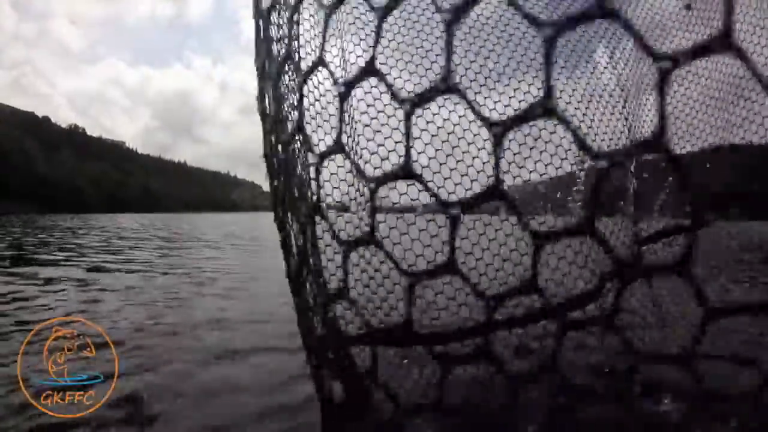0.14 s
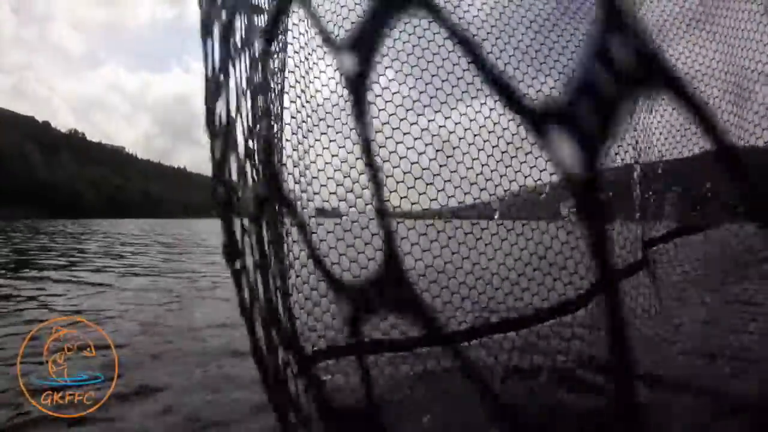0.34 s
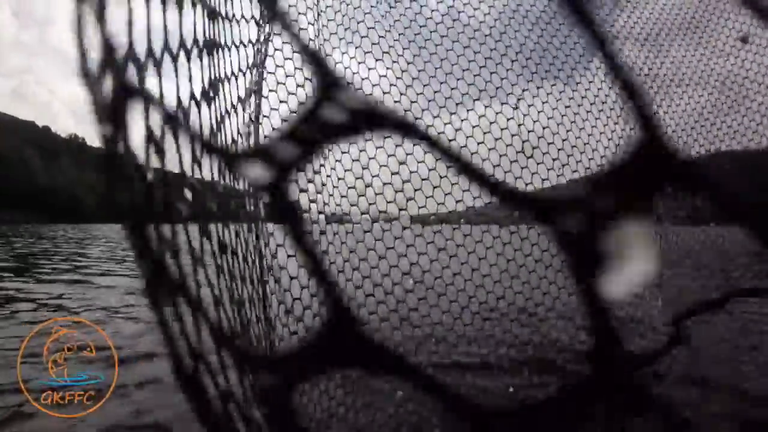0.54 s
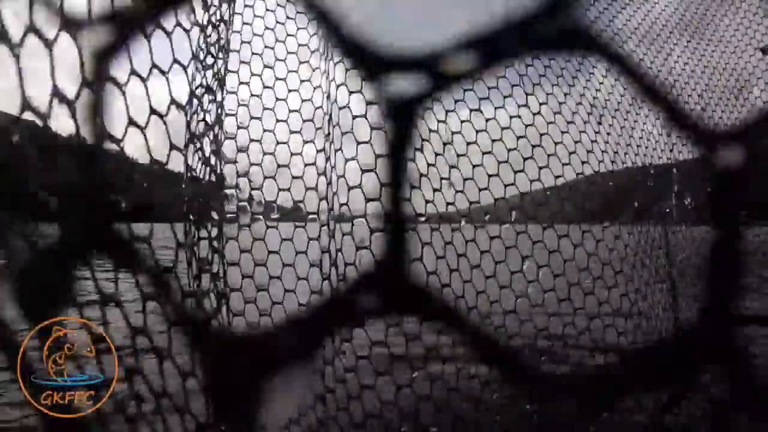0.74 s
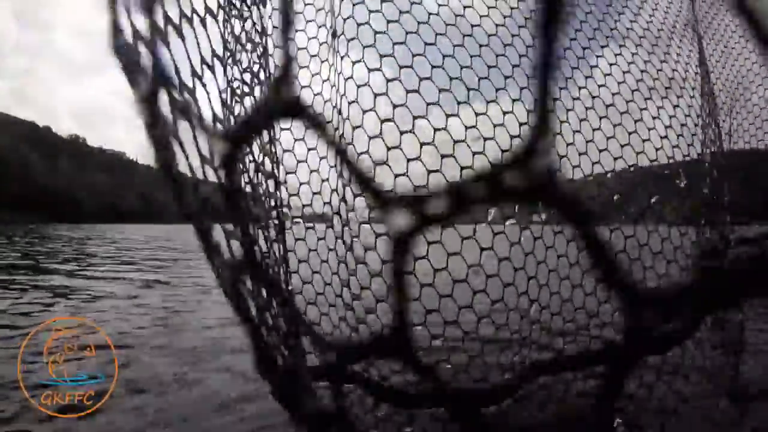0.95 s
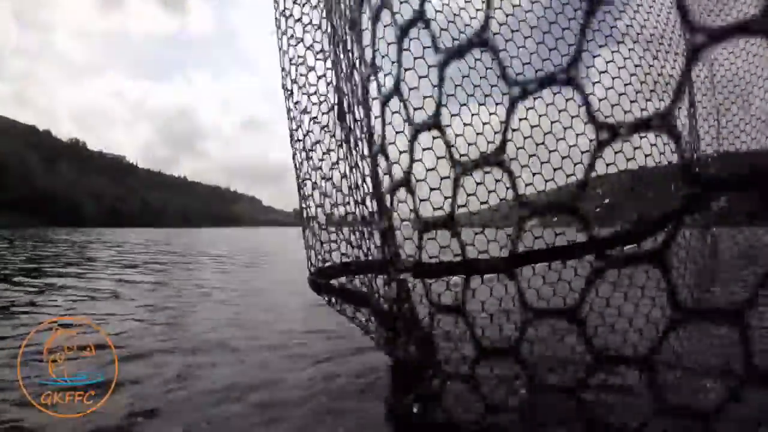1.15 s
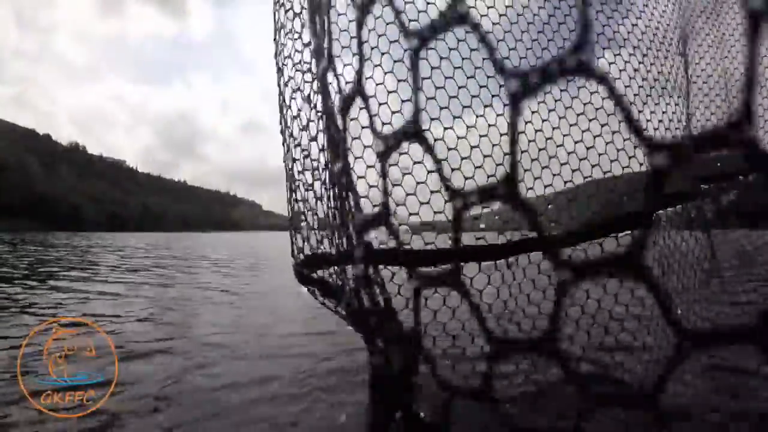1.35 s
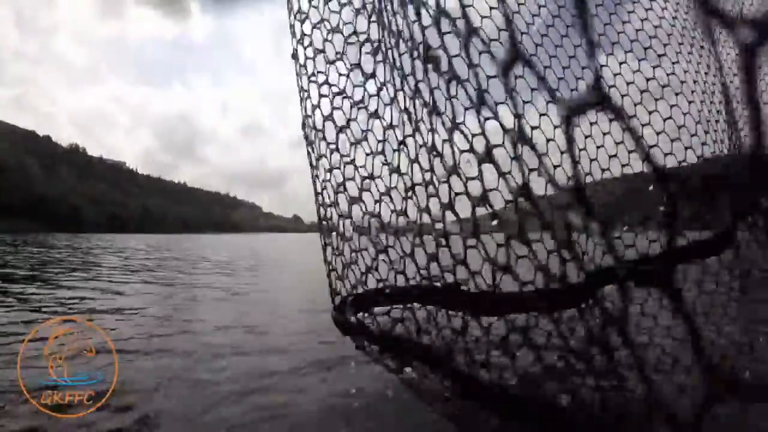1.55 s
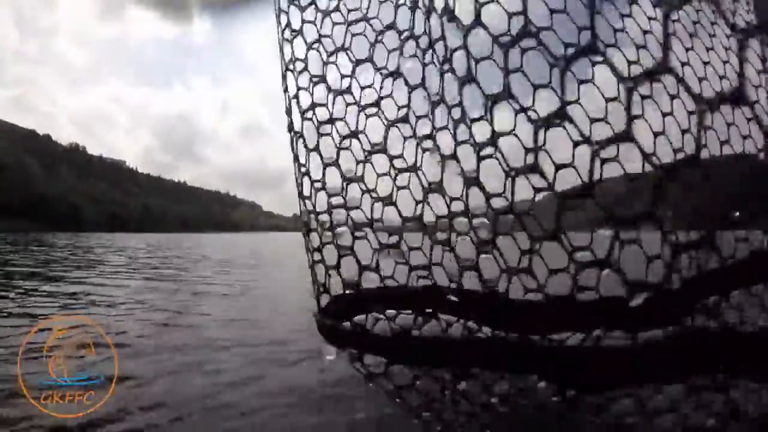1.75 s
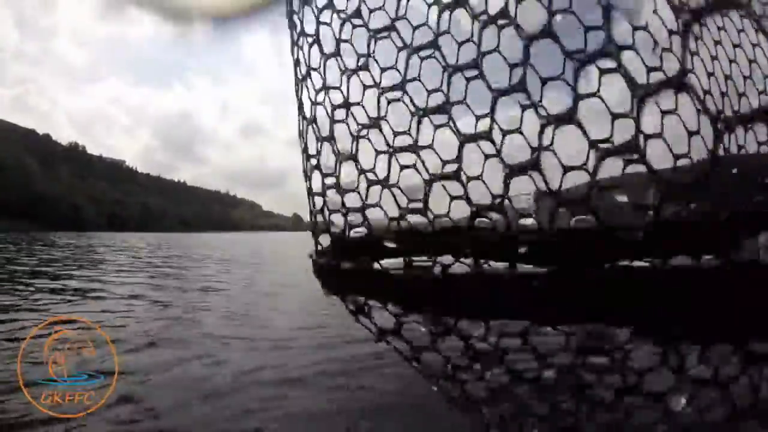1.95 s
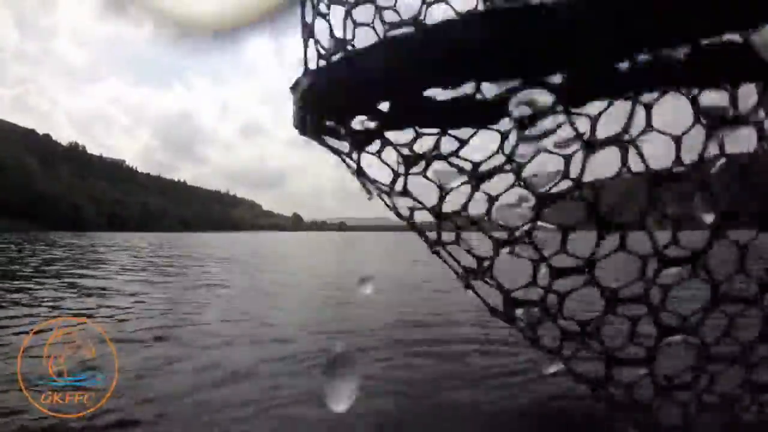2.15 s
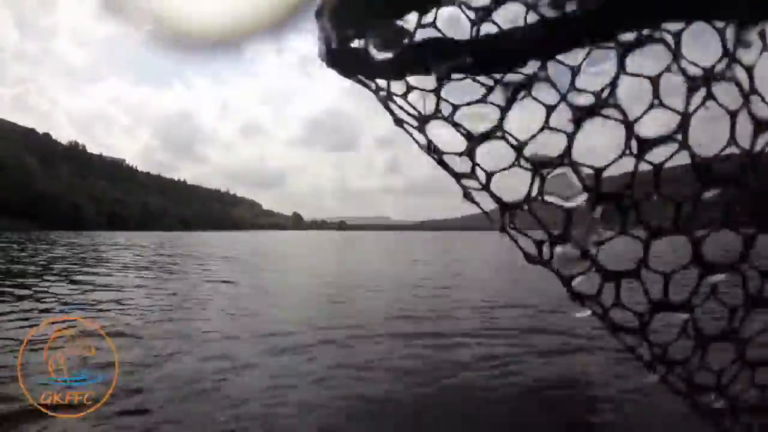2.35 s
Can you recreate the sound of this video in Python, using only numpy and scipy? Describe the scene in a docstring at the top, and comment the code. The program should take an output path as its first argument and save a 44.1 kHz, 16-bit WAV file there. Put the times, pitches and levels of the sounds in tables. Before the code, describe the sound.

Wet landing net rasps and scrapes across a camera housing at a lake's edge, with drips

```python
"""A wet landing net drags over a camera housing at the waterline of a lake, close to the one microphone.
Four strokes of mesh rasp as dense stick-slip impulses coloured by the housing; knots scrape as short
bursts and strands snap as clicks with a gritty tail. Mesh and housing resonate, from slow swells to
millisecond pitched knocks; fine mesh zips, a strand squeaks, and low thumps mark the net's bumps.
Drops tick and bubble on the lake, over a faint noise wash and a bass rumble of wind and the moving net."""
import sys
import numpy as np
from scipy import signal
from scipy.fft import rfft, irfft, next_fast_len
from scipy.io import wavfile
from scipy.ndimage import uniform_filter1d, map_coordinates

SR = 44100
rng = np.random.default_rng(int(sys.argv[2]) if len(sys.argv) > 2 else 0)


def unload_audio(sound):
    """Save the sound as a 16-bit wav file, at the path given as the first command line argument."""
    columns = np.transpose(np.atleast_2d(sound))
    # keep every value between -1 and 1, then stretch to whole-number steps
    steps = np.round(np.clip(columns, -1, 1) * 32767)
    wavfile.write(sys.argv[1], SR, steps.astype(np.int16))


N = 110250  # samples: 2.5 s

# Colour of the housing where the side mesh slides. Each row: frequency in Hz, gain in dB.
SIDE_COLOUR = [(180, -51), (340, -16), (467, -32), (523, -10.5), (647, -20), (828, -12.5), (1010, -18),
               (1350, -8.5), (1760, -1), (1970, -4.5), (2690, 4), (3070, -7.5), (4200, -4.5), (4620, -16),
               (6300, -11), (7790, -18.5), (15000, -32.5)]

SHELF_HZ, BODY_HZ = 3380, 1330  # treble lies above the first corner, body below the second
SLIP_SPREAD = 0.35  # unevenness of the slips (natural log of strength)
PATCHY_DB = 2  # depth of the patches in the colour
CONTACT_SHIFT = 0.016  # shift of the housing colour from knot to knot (natural log of frequency)
FLUTTER_DB, FLUTTER_PER_S = 1.17, 130  # unsteadiness of the rubbing
HISS_GROWS = 0.26  # extra dB of treble per dB of rubbing
HISS_FLUTTER_DB = 0.5  # the treble's own unsteadiness
FADE_S = 0.04  # ramp at either end of a stroke
SNAP_T60_S, SNAP_RISE_S, SNAP_GRIT = 0.016, 0.0008, 0.43  # the grit's decay, onset and share
DROP_T60_S, DROP_RISE_S = 0.022, 0.00045
DROP_BEND_PER_S = 4.4  # the pitch rises by twice this fraction per second
DROP_ROUGH = 0.52  # phase unsteadiness of a bubble (radians)
SQUEAK_S, SQUEAK_LENGTH_S, SQUEAK_DB = 1.752, 0.015, -38
SQUEAK_HZ, SQUEAK_ARCH_HZ = 4240, 910  # top pitch, and its fall towards either end
RESONANCE_WAVER = 0.99  # phase unsteadiness (radians)
ZIP_HZ = 8170
ZIP_KNOTS_PER_S = 950  # faster random motion widens the band
LAKE_DB = -57
TOP_HZ = 15450  # the microphone's band limit


def amp(db):
    """Decibels to gain."""
    return 10 ** (np.asarray(db) / 20)


def unit(x):
    """x at rms 1."""
    return x / np.sqrt(np.mean(x ** 2) + 1e-20)


def curve(rows):
    """(s, value) points as one value per sample."""
    return np.interp(np.arange(N) / SR, *np.transpose(rows))


def wobble(rate):
    """A smooth random curve, rate knots a second."""
    return map_coordinates(rng.standard_normal(4096), [np.arange(N) * rate / SR], mode="mirror")


def bell(t, middle_s, width_s):
    """A Gaussian swell and fade; width_s is its standard deviation."""
    return np.exp(-((t - middle_s) / width_s) ** 2 / 2)


def add(out, s, x):
    """Mix x into out from time s."""
    part = out[max(round(s * SR), 0):][:len(x)]
    part += x[:len(part)]


def coloured(x, points, treble_db=0, body_db=0, stretch=1):
    """x through a causal minimum-phase filter of (Hz, dB) points, with a shelf at either end."""
    m = 2 * next_fast_len(len(x) // 2 + 4096)
    f = np.fft.rfftfreq(m, 1 / SR)
    hz, db = np.transpose(points)

    def above(corner):
        return f ** 6 / (f ** 6 + corner ** 6)

    shape_db = np.interp(np.log(f + 1), np.log(hz * stretch + 1), db)
    shape_db = shape_db + treble_db * above(SHELF_HZ) + body_db * (1 - above(BODY_HZ))
    # folding the cepstrum onto positive time makes the response causal
    cepstrum = irfft(np.log(amp(np.maximum(shape_db, -100))))
    cepstrum[1:m // 2] *= 2
    cepstrum[m // 2 + 1:] = 0
    response = np.exp(rfft(cepstrum))
    return irfft(rfft(x, m) * response, m)[:len(x)]


def patchy(x):
    """x with brief random patches of gain across its spectrum, as the point of contact wanders."""
    z = signal.stft(x, nperseg=256)[2]
    field = uniform_filter1d(rng.standard_normal(z.shape), size=3, axis=0)  # across frequency
    field = uniform_filter1d(field, size=8, axis=1)  # across time
    return signal.istft(z * amp(PATCHY_DB * unit(field)))[1][:len(x)]


def slips(size, per_s):
    """Tiny stick-slip impulses of random sign and uneven strength, at rms 1."""
    hit = rng.random(size) < per_s / SR
    sign = rng.choice([-1, 1], size)
    strength = np.exp(SLIP_SPREAD * rng.standard_normal(size))
    return unit(hit * sign * strength)


def lake():
    """A faint wash of ripples and air: steady noise, strongest in the lows."""
    # Colour of the wash. Each row: frequency in Hz, gain in dB.
    wash_colour = [(60, -32), (100, 3), (400, -2.5), (1490, -9), (1900, -12.5), (4200, -19), (8300, -24.5),
                   (15000, -38)]
    return amp(LAKE_DB) * unit(coloured(rng.standard_normal(N), wash_colour))


def rumble(trim_db=-1):
    """Wind and the moving net shake the microphone: bass noise, softly limited, that swells and sinks."""
    # Strength of the shaking. Each row: time in seconds, level in dB before the trim.
    shake_level = [(0, -66), (0.3, -50), (0.4, -58), (0.46, -46.5), (0.64, -50.5), (0.75, -43), (0.95, -57),
                   (1.45, -54), (1.53, -45.5), (1.82, -46), (1.97, -46.5), (2.08, -43), (2.22, -50),
                   (2.5, -62.5)]
    # Colour of the shaking before limiting. Each row: frequency in Hz, gain in dB.
    shake_colour = [(12, -26), (20, 4), (35, 5), (50, -2), (80, 1), (116, -7), (250, -16.5), (400, -36),
                    (800, -89.5)]
    shake = np.tanh(0.5 * unit(coloured(rng.standard_normal(N), shake_colour)))
    return amp(curve(shake_level) + trim_db) * unit(shake)


def drops(tick_db=-12):
    """Each drop ticks on the lake and leaves a small bubble whose pitch rises as it dies."""
    # Drops hitting the lake. Each row: start in seconds, level in dB, starting bubble pitch in Hz.
    drop_rows = [(0.046, -43.5, 3400), (0.101, -38, 2720), (1.096, -40, 2880), (1.196, -48, 3350),
                 (2.167, -46, 7040), (2.429, -41.5, 1030), (2.434, -41.5, 1480)]
    out, t = np.zeros(N), np.arange(SR // 16) / SR
    for s, db, hz in drop_rows:
        roughness = DROP_ROUGH * wobble(1340)[:len(t)]
        bubble = np.sin(2 * np.pi * hz * t * (1 + DROP_BEND_PER_S * t) + roughness)
        tick = amp(tick_db) * unit(coloured(rng.standard_normal(len(t)), SIDE_COLOUR))
        envelope = amp(db - 60 * t / DROP_T60_S) * (1 - np.exp(-t / DROP_RISE_S))
        add(out, s, envelope * (bubble + tick))
    return out


def bumps():
    """Dull pushes of the net on the housing: a decaying low tone, each with a short noise thud."""
    # Each row: start in seconds, level in dB, pitch in Hz, time to fall 60 dB in seconds,
    # thud in dB relative to the push.
    bump_rows = [(0.444, -38.5, 105.5, 0.31, -23), (0.536, -27.5, 53, 0.08, -12.5),
                 (1.584, -33, 89.8, 0.26, -18), (1.807, -34.5, 87, 0.27, -27),
                 (2.034, -25.5, 42.1, 0.29, -13), (2.111, -22, 83, 0.053, 0)]
    out, t = np.zeros(N), np.arange(SR // 3) / SR
    thud_band = signal.butter(2, [130, 330], "band", fs=SR, output="sos")
    for s, db, hz, t60, thud_db in bump_rows:
        thud = unit(signal.sosfilt(thud_band, rng.standard_normal(len(t))))
        push = amp(-60 * t / t60) * np.sin(2 * np.pi * hz * t)
        push = push + amp(thud_db - 60 * t / 0.038) * thud
        add(out, s, amp(db) * (1 - np.exp(-t / 0.0057)) * push)
    return out


def squeak():
    """A wet strand slips regularly as it stretches over the rim; its pitch arches with the tension."""
    out, u = np.zeros(N), np.linspace(-1, 1, int(SQUEAK_LENGTH_S * SR))
    pitch_hz = SQUEAK_HZ - SQUEAK_ARCH_HZ * u * u
    tone = np.sin(2 * np.pi * np.cumsum(pitch_hz) / SR)
    add(out, SQUEAK_S, amp(SQUEAK_DB) * (1 - u * u) * tone)
    return out


def zips():
    """The fine mesh zips as it runs fastest: brief flares of a narrow, high band of noise."""
    # Each row: middle in seconds, half-length in seconds, level in dB.
    zip_rows = [(0.589, 0.019, -39.5), (0.703, 0.011, -46), (0.836, 0.0046, -41.5)]
    t = np.arange(N) / SR
    phase = 2 * np.pi * ZIP_HZ * t
    rasp = wobble(ZIP_KNOTS_PER_S) * np.sin(phase) + wobble(ZIP_KNOTS_PER_S) * np.cos(phase)
    return unit(rasp) * sum(amp(db) * bell(t, s, width) for s, width, db in zip_rows)


def resonances():
    """Brief resonances of mesh and housing: some swell as the net pulls, others are knocks at hits."""
    # Each row: middle in seconds, half-length in seconds (a few milliseconds for a pitched knock),
    # pitch in Hz, level in dB.
    resonance_rows = [(0.243, 0.022, 517, -49), (0.262, 0.067, 813, -58.5), (0.237, 0.028, 1140, -51),
                      (0.248, 0.0024, 1560, -28.5), (1.799, 0.034, 815, -51.5), (1.788, 0.032, 1034, -52.5),
                      (1.801, 0.0039, 1800, -35), (2.038, 0.002, 2330, -26), (2.118, 0.0023, 1560, -25),
                      (2.118, 0.0026, 1920, -29), (2.168, 0.0022, 1640, -40.5)]
    t = np.arange(N) / SR
    out = np.zeros(N)
    for s, width, hz, db in resonance_rows:
        tone = np.sin(2 * np.pi * hz * t + RESONANCE_WAVER * wobble(100))
        out += amp(db) * bell(t, s, width) * tone
    return out


def snaps(start, end, colour, trim_db):
    """Strands snap free in one stroke: a click and a decaying gritty tail, ringing in the housing."""
    # Each row: start in seconds, level in dB before the trim, treble in dB, body in dB.
    snap_rows = [(0.179, -37.5, -14, -45), (0.22, -32, -6, 0), (0.2915, -38.5, -24, -18),
                 (0.467, -38, -3, -11), (0.4965, -36, -5, -26), (0.618, -21, -11, -37),
                 (0.8595, -27.5, -2, 11.5), (1.298, -47, -14, -11), (1.552, -38, 3, -22),
                 (1.596, -33.5, -9, -13), (1.934, -32, 9.5, 0), (1.9655, -29, 5, -2), (2.038, -24.5, -4, 2),
                 (2.118, -26, -2, -3)]
    out, age = np.zeros(N), np.arange(SR // 8) / SR
    for s, db, treble_db, body_db in snap_rows:
        if start <= s < end:
            grit = rng.standard_normal(len(age)) * amp(-60 * age / SNAP_T60_S)
            grit = grit * (1 - np.exp(-age / SNAP_RISE_S))
            snap = coloured((age == 0) + SNAP_GRIT * grit, colour, treble_db, body_db)
            add(out, s, amp(db + trim_db) * unit(snap))
    return out


def knots(start, end, colour, trim_db, slips_per_s):
    """Knots scrape past in one stroke: swelling bursts of slips, each with its own contact colour."""
    # Each row: middle in seconds, level in dB before the trim and the scaling by length,
    # half-length in seconds, treble in dB, body in dB.
    knot_rows = [(0.2, -42.5, 0.0058, 3, -11), (0.248, -31.5, 0.0047, -2, -5),
                 (0.341, -37.5, 0.0089, -11, -8), (0.451, -41.5, 0.0041, 6.5, 12),
                 (0.486, -31.5, 0.0046, -12, 4), (0.544, -32, 0.0073, 7.5, 11.5),
                 (0.605, -32, 0.0035, -6, -9), (0.641, -28.5, 0.0057, 3, -3), (0.668, -38, 0.0053, 0, -6),
                 (0.702, -29, 0.0069, 0, 7.5), (0.833, -29.5, 0.0047, 1, -13),
                 (0.892, -32.5, 0.0046, -1, -7), (0.955, -37.5, 0.01, -2, 15), (1.103, -46, 0.012, -12, -1),
                 (1.185, -47.5, 0.011, -1, -5), (1.238, -44.5, 0.0053, -3, -3),
                 (1.494, -40.5, 0.0077, 0.5, -2), (1.515, -44, 0.0067, 7, 8),
                 (1.553, -39.5, 0.0042, -6, -14), (1.615, -37, 0.0045, 3, 7.5),
                 (1.654, -35.5, 0.0052, -2, -25), (1.688, -40.5, 0.009, 4, -5),
                 (1.717, -36.5, 0.004, 7.5, -6), (1.755, -36, 0.0056, 4, 2),
                 (1.767, -34, 0.0045, 1.5, 10.5), (1.802, -34, 0.0028, -3, 2),
                 (1.811, -35, 0.0072, -2.5, -1), (1.948, -34.5, 0.0048, -1, -14),
                 (1.997, -38.5, 0.0063, 0, -21), (2.076, -36, 0.0061, -4.5, -5),
                 (2.117, -32.5, 0.003, 4, 8.5), (2.187, -45.5, 0.0044, -9, 4)]
    out, age = np.zeros(N), np.arange(SR // 8) / SR
    for s, db, width, treble_db, body_db in knot_rows:
        if start <= s < end:
            width = max(width, 0.001)
            swell = np.exp(-np.abs(age / width - 2))
            burst = patchy(slips(len(age), 4 * slips_per_s)) * swell
            stretch = np.exp(CONTACT_SHIFT * rng.standard_normal())
            scrape = unit(coloured(burst, colour, treble_db, body_db, stretch))
            # a longer knot carries more energy
            add(out, s - 2 * width, amp(db + trim_db) * scrape * np.sqrt(width / age[-1]))
    return out


def stroke(level, colour, rub_db, knot_db, snap_db, hiss_db, slips_per_s):
    """One pass of mesh over the housing: a rasp that brightens with pressure, and its knots and snaps."""
    t = np.arange(N) / SR
    start, end = level[0][0], level[-1][0]
    gate = np.clip(np.minimum(t - start, end - t) / FADE_S + 0.5, 0, 1)
    level_db = curve(level)
    pressure = gate * amp(level_db + rub_db + FLUTTER_DB * wobble(FLUTTER_PER_S))
    rasp = unit(patchy(coloured(slips(N, slips_per_s), colour)))
    highpass = signal.butter(2, SHELF_HZ, "high", fs=SR, output="sos")
    hiss = signal.sosfiltfilt(highpass, rasp)
    bright_db = hiss_db + HISS_GROWS * (level_db - level_db.max()) + HISS_FLUTTER_DB * wobble(90)
    rubbing = pressure * (rasp + hiss * (amp(bright_db) - 1))
    scrapes = knots(start, end, colour, knot_db, slips_per_s)
    return rubbing + scrapes + snaps(start, end, colour, snap_db)


def net():
    """Four strokes of wet mesh: first brush, long drag, slide of the side mesh, pass of the rim."""
    # Rubbing in each stroke. Each row: time in seconds, level in dB before the stroke's rub_db.
    brush = [(0, -64), (0.17, -62), (0.19, -59), (0.235, -36), (0.27, -39.5), (0.35, -44), (0.39, -46.5),
             (0.47, -40.5)]
    drag = [(0.47, -42), (0.52, -40), (0.62, -35), (0.72, -38.5), (0.81, -40.5), (0.88, -39.5), (0.95, -41),
            (0.99, -45.5), (1.05, -53)]
    slide = [(1.03, -45), (1.07, -53.5), (1.12, -47.5), (1.21, -56.5), (1.30, -48.5), (1.37, -59.5),
             (1.44, -46.5), (1.48, -54), (1.53, -45.5), (1.72, -46), (1.78, -41), (1.92, -43.5)]
    rim = [(1.92, -52), (1.98, -45.5), (2.03, -44.5), (2.14, -48.5), (2.195, -56.5)]
    # Colour of the housing where the other three strokes touch it. Each row: frequency in Hz, gain in dB.
    brush_colour = [(180, -38), (400, -14), (1000, -17), (1330, -9), (1570, 3), (2000, -8.5), (2400, 5.5),
                    (2780, -2), (3200, -16), (3750, -7.5), (4700, -21), (5800, -19), (6260, -8),
                    (6800, -17.5), (9000, -29), (15000, -36)]
    drag_colour = [(180, -49), (300, -22.5), (650, -25.5), (1190, -18.5), (1570, -1), (1880, -6), (2180, 3),
                   (3440, -14), (4180, -12), (4950, -16), (5620, -27), (6200, -16.5), (6840, -20),
                   (8190, -15), (9640, -33.5), (11700, -28), (15000, -37)]
    rim_colour = [(180, -23), (300, -17), (430, -27), (541, -15), (647, -19), (1080, -14.5), (1590, -1),
                  (2140, -7), (2480, -0.5), (3170, -13.5), (3860, -14), (5090, -22.5), (7420, -24),
                  (15000, -45)]
    return (stroke(brush, brush_colour, rub_db=-4, knot_db=-2, snap_db=-15, hiss_db=1, slips_per_s=1800)
            + stroke(drag, drag_colour, rub_db=1.5, knot_db=-2.5, snap_db=-18, hiss_db=1.5,
                     slips_per_s=2400)
            + stroke(slide, SIDE_COLOUR, rub_db=-3, knot_db=-0.8, snap_db=-17, hiss_db=-1,
                     slips_per_s=2800)
            + stroke(rim, rim_colour, rub_db=-2.5, knot_db=0.5, snap_db=-19.5, hiss_db=5.5,
                     slips_per_s=3000))


def scene():
    """Everything at the one microphone, from the lake behind to the net up close."""
    background = lake() + rumble()
    contacts = drops() + bumps() + squeak() + zips() + resonances()
    return (background + contacts + net())[None]


def record(dry):
    """The camera's microphone keeps nothing at or above its band limit."""
    m = next_fast_len(N + 4096)
    passed = np.fft.rfftfreq(m, 1 / SR) < TOP_HZ
    return irfft(rfft(dry, m) * passed, m)[:, :N]


dry = scene()
out = record(dry)
unload_audio(out)
```